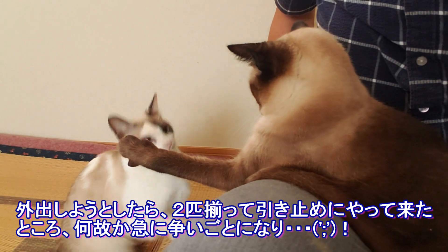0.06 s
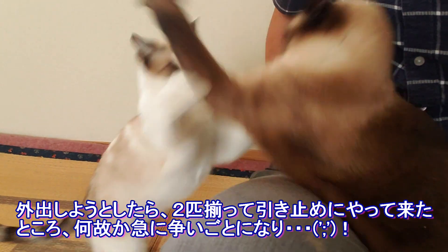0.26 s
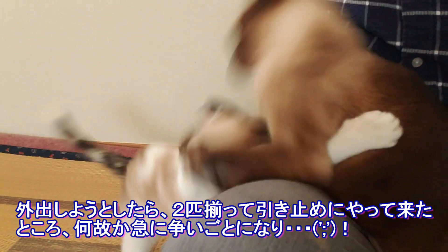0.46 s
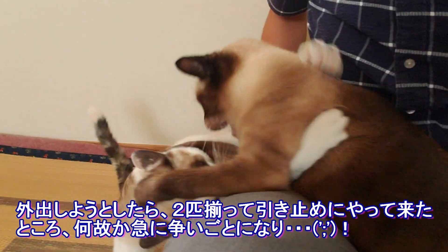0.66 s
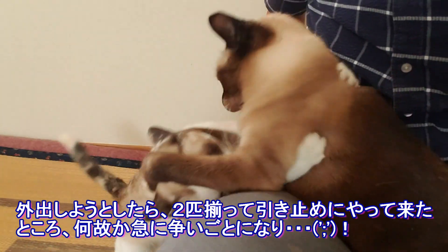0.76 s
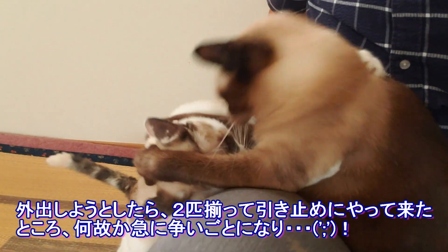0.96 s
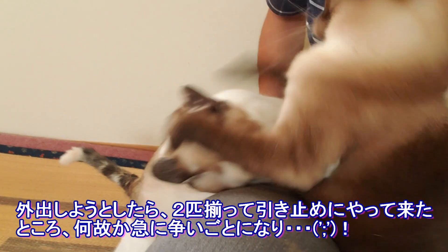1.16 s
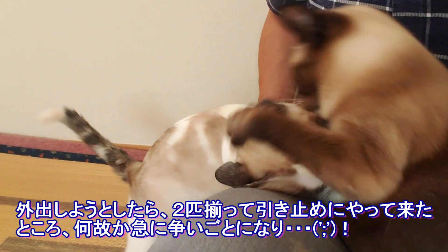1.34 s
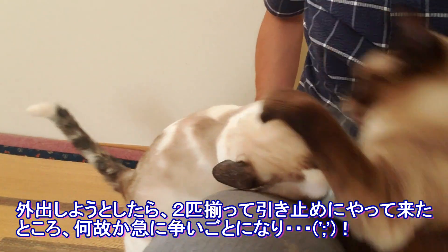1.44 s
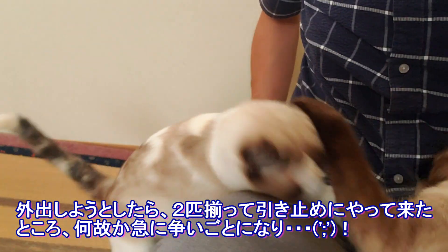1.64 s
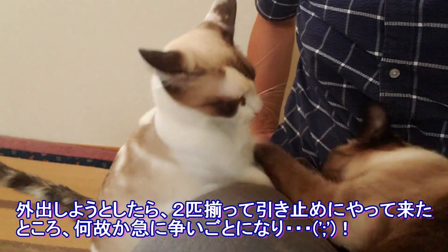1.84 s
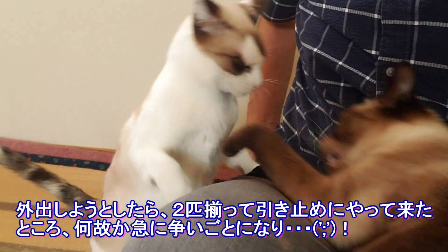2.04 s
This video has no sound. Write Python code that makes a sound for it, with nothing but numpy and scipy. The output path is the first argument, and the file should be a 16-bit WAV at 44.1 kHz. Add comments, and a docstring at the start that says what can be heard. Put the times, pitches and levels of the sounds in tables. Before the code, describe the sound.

Cats wrestle up close: cloth and fur rustle while paws scrabble and claws tick.

```python
"""Two cats wrestling on a lap

In a quiet room, close to a small camera, friction makes cloth rustle and fur hiss and swish over fur.
Bodies knock softly in low damped modes, paws scrabble in runs of tiny impacts, and claws tick and snag
with a brief ring. The two microphone ports drift from nearly in phase in the bass to opposite above it."""
import sys
import numpy as np
from scipy import signal
from scipy.fft import rfft, irfft, next_fast_len
from scipy.io import wavfile
from scipy.ndimage import uniform_filter1d

SR = 44100
rng = np.random.default_rng(int(sys.argv[2]) if len(sys.argv) > 2 else 0)


def put_to_file(sound):
    """Save the sound as 16-bit audio at rate SR, in the file named by the first command-line argument."""
    columns = np.atleast_2d(sound).T  # one column per channel
    safe = np.clip(columns, -1, 1)
    whole_steps = np.round(safe * 32767)
    wavfile.write(sys.argv[1], SR, whole_steps.astype(np.int16))


N = 92610

# Colour that the microphone gives to sharp edges: frequency_hz, gain_db
EDGE_TONE = [(300, -20), (1200, -8), (3000, 0), (4000, -5), (7000, -1), (8800, -14), (11500, -6),
             (16000, -12)]
# Course of the rubbing: time_s, cloth_db, fur_hiss_db, swish_db
RUBBING_LEVELS = [(0, -67, -73, -74.5), (.325, -58.5, -62, -69), (.356, -40.5, -43, -60),
                  (.44, -43.5, -46.5, -54), (.55, -37.5, -48, -49), (.66, -48, -45, -35.5),
                  (.74, -46, -54.5, -53.5), (.86, -63, -53.5, -48.5), (.93, -67.5, -63.5, -55.5),
                  (1.07, -57, -60.5, -64), (1.11, -51.5, -57.5, -64.5), (1.25, -45.5, -45.5, -46.5),
                  (1.33, -49.5, -54, -57.5), (1.435, -48, -56, -65), (1.46, -40.5, -42.5, -51),
                  (1.63, -43, -47.5, -52.5), (1.69, -43.5, -49, -51), (1.745, -55, -58, -55.5),
                  (1.78, -45.5, -45.5, -52.5), (1.92, -58.5, -51.5, -49), (2.03, -68, -65, -64),
                  (2.1, -58, -57, -59.5)]


def amp(db):
    """Amplitude ratio of a level in decibels."""
    return 10 ** (np.asarray(db) / 20)


def unit_rms(x):
    """Normalisation to a mean power of one."""
    return x / np.sqrt(np.mean(x ** 2) + 1e-20)


def at_frequency(table, hz, column=1):
    """Interpolation of a table on a logarithmic frequency axis."""
    columns = np.transpose(table)
    return np.interp(np.log(hz + 1), np.log(columns[0] + 1), columns[column])


def envelope(table, column=1):
    """Amplitude over time, moving linearly in decibels between points."""
    columns = np.transpose(table)
    return amp(np.interp(np.arange(N) / SR, columns[0], columns[column]))


def add(mix, start_s, sound):
    """Superposition of a sound on the mix."""
    part = mix[round(start_s * SR):][:len(sound)]
    part += sound[:len(part)]


def coloured(x, tone):
    """Minimum-phase filtering: the phase follows from the Hilbert transform of the log gain."""
    log_gain = np.log(amp(at_frequency(tone, abs(np.fft.fftfreq(4096, 1 / SR)))))
    taps = np.fft.ifft(np.exp(np.conj(signal.hilbert(log_gain)))).real[:2048]
    return signal.oaconvolve(x, taps)[:len(x)]


def noise_pair(tone, patchy_db, flicker_db, size=256):
    """Two incoherent noises, modulated by the same spectral patches and flicker; joint rms 1."""
    frames, hz = N * 4 // size + 5, np.fft.rfftfreq(size, 1 / SR)
    re0, im0, re1, im1, patches = rng.standard_normal((frames, len(hz), 5)).T
    patches = unit_rms(uniform_filter1d(uniform_filter1d(patches, size=9, axis=0), size=14, axis=1))
    flicker = unit_rms(uniform_filter1d(rng.standard_normal(frames), size=5))
    gain = amp(at_frequency(tone, hz)[:, None] + patchy_db * patches + flicker_db * flicker)
    spectra = np.array([re0 + 1j * im0, re1 + 1j * im1]) * gain
    return unit_rms(signal.istft(spectra, nperseg=size, noverlap=size * 3 // 4)[1][:, :N])


def grains(samples, per_s=800, spread_db=4.5):
    """Shot noise: sparse clicks of random sign and power-law size, a few of them large."""
    sign, size, chance = rng.random((samples, 3)).T
    return np.sign(sign - .5) * amp(-spread_db * np.log(size + 0.028)) * (chance < per_s / SR)


def background():
    """The noise floor: a low, lumpy rumble under room air and microphone hiss."""
    # Course of the rumble: time_s, level_db
    rumble_levels = [(0, -56), (.3, -53.5), (.4, -44), (1.15, -51), (2.1, -54)]
    # Spectra of the rumble and of the air with its hiss: frequency_hz, density_db
    rumble_tone = [(22, -18), (34, -20), (42, 6.5), (54, -8.5), (85, -6), (130, -14.5), (300, -50)]
    air_tone = [(220, -12), (400, -12), (1300, -14.5), (1800, -25), (3000, -48), (5500, -29.5),
                (7200, -22.5), (8800, -38), (16000, -30)]
    rumble = noise_pair(rumble_tone, patchy_db=-3, flicker_db=0.7, size=8192)
    air = noise_pair(air_tone, patchy_db=2.5, flicker_db=1.5, size=1024)
    return envelope(rumble_levels) * rumble + amp(-55.5) * air


def cloth_rustle():
    """Sliding friction on cloth gives broadband noise with a crackle in it."""
    # Spectrum of rubbed cloth: frequency_hz, density_db
    cloth_tone = [(100, -39), (220, 2), (1300, 1), (3500, -7.5), (9000, -29)]
    crackle = unit_rms(coloured(grains(N, per_s=700, spread_db=2.0), cloth_tone))
    rustle = noise_pair(cloth_tone, patchy_db=4.0, flicker_db=0.5)
    rustle[0] = unit_rms(rustle[0] + .6 * crackle)
    return envelope(RUBBING_LEVELS) * rustle


def fur_rubbing():
    """Friction of fur on fur gives a treble hiss with fine scratches, and a higher swish."""
    # Spectra of the hiss and the swish: frequency_hz, density_db
    hiss_tone = [(2500, -78), (4000, 1.5), (5300, 2.5), (7200, 6), (9000, -10.5), (12000, -14)]
    swish_tone = [(6000, -35), (8800, -0.5), (11000, 20), (11600, 16), (12700, 18.5), (13600, 6.5),
                  (16000, -13)]
    hiss = noise_pair(hiss_tone, patchy_db=2.2, flicker_db=1.8)
    scratches = unit_rms(coloured(grains(N), hiss_tone))
    hiss[0] = unit_rms(hiss[0] + .7 * scratches)
    swish = noise_pair(swish_tone, patchy_db=3.0, flicker_db=0.55)
    return envelope(RUBBING_LEVELS, column=2) * hiss + envelope(RUBBING_LEVELS, column=3) * swish


def body_knocks():
    """A soft impact excites two low, heavily damped modes; lower knocks ring longer."""
    # Knocks of bodies and paws: start_s, level_db, pitch_hz
    knocks = [(.379, -32, 212), (.484, -33, 93.5), (.5175, -16, 716), (.533, -32.5, 103),
              (.592, -31.5, 197), (1.446, -21, 597), (1.452, -16.5, 432), (1.471, -27, 500),
              (1.518, -21.5, 224), (1.562, -40.5, 74.5), (1.764, -28.5, 380)]
    rise_s, base_ring_s, ring_cycles = 0.00061, 0.0089, 8.7
    mix = np.zeros(N)
    for start_s, level_db, pitch_hz in knocks:
        t60 = base_ring_s + ring_cycles / pitch_hz
        t = np.arange(round(t60 * SR)) / SR
        phase = 2 * np.pi * pitch_hz * t
        modes = np.sin(phase) + amp(-10.5) * np.sin(1.3 * phase)
        add(mix, start_s, amp(level_db - 60 * t / t60) * (1 - np.exp(-t / rise_s)) * modes)
    return mix


def paw_scrabbles():
    """Dense tiny impacts drive a broad cloth resonance; their derivative adds a treble edge."""
    # Runs of paws over cloth: start_s, length_s, level_db, centre_hz, treble_db
    scrabbles = [(.357, 0.03, -42, 1100, -21), (.47, 0.042, -34, 2350, -23), (.516, 0.029, -28, 2100, -2),
                 (.64, 0.061, -41.5, 5540, -33), (.762, 0.067, -43, 2600, -24),
                 (1.452, 0.006, -31, 1930, -43), (1.456, 0.0044, -37, 5400, 2),
                 (1.675, 0.037, -46.5, 3733, 5), (1.763, 0.015, -38, 4760, 35)]
    swell_s, fade_db = .15, -12  # a run of length swell_s would take all of it to set in
    mix = np.zeros(N)
    for start_s, length_s, level_db, hz, treble_db in scrabbles:
        progress = np.arange(round(length_s * SR)) / (length_s * SR)
        contour = np.minimum(progress * swell_s / length_s, 1) * amp(fade_db * progress ** 2)
        friction = unit_rms(grains(len(progress))) + 0.3 * rng.standard_normal(len(progress))
        drive = np.append(contour * friction, np.zeros(600))
        resonance = [(hz / 5, -18), (hz * 0.68, -3), (hz * 0.84, -1), (hz * 2.4, -16), (SR / 2, -50)]
        body = unit_rms(coloured(drive, resonance))
        edge = unit_rms(coloured(np.diff(drive, prepend=0), EDGE_TONE))
        add(mix, start_s, amp(level_db) * unit_rms(body + amp(treble_db) * edge))
    return mix


def claw_ticks():
    """A sharp impact gives a damped ring, a bright edge and a puff of cloth noise."""
    # Ticks and snags of claws: start_s, level_db, pitch_hz, edge_db
    ticks = [(.1185, -35, 7000, 6.5), (.3352, -12.5, 6800, -23), (.3602, -16.5, 6900, 3),
             (.5095, -18, 1510, -17), (.5205, -14.5, 2240, -13), (.5245, -19, 1790, -18),
             (.4856, -33, 1680, -24), (.4904, -16, 2220, -6), (.5171, -18.5, 1720, 14.5),
             (.5352, -15, 2710, -2), (.5929, -21.5, 2440, 1), (.8395, -29.5, 1660, -17),
             (.9927, -32, 1650, -21), (.3807, -23, 790, -26.5), (1.0872, -30, 5500, -5),
             (1.1013, -20, 2940, -24), (1.104, -35, 2460, -22), (1.1109, -8, 2770, -10),
             (1.1333, -20, 3200, -4), (1.1651, -3, 2960, -6.5), (1.2403, -23.5, 1120, -1),
             (1.2559, -15.5, 3050, -4), (1.3669, -23.5, 1400, -0.5), (1.4469, -12.5, 2820, 1),
             (1.4532, -4.5, 2930, -4), (1.5179, -15, 1200, 0.5), (1.639, -11.5, 1505, -10),
             (1.7798, -32, 6400, -15), (1.8322, -14.5, 7600, -22)]
    rise_cycles, ring_cycles = .25, 5  # the ring falls 60 dB in ring_cycles
    edge_t60_s, puff_t60_s = 0.0018, 0.0031
    t = np.arange(1500) / SR
    burst = amp(-60 * t / edge_t60_s) + amp(-22.5 - 60 * t / puff_t60_s)
    mix = np.zeros(N)
    for start_s, level_db, pitch_hz, edge_db in ticks:
        cycles = pitch_hz * t
        # Only the lower ticks have an overtone, and it dies faster than the fundamental.
        overtone_ratio = 1.85 * rng.uniform(0.86, 1.125)
        overtone_gain = amp(3 - 30 * cycles / ring_cycles) * (pitch_hz < SR / 10)
        modes = np.sin(2 * np.pi * cycles) + overtone_gain * np.sin(2 * np.pi * overtone_ratio * cycles)
        ring = (1 - np.exp(-cycles / rise_cycles)) ** 2 * amp(-60 * cycles / ring_cycles) * modes
        edge = amp(edge_db) * coloured(burst * rng.standard_normal(len(t)), EDGE_TONE)
        bass_cut = signal.butter(2, pitch_hz / 2, "high", fs=SR)  # a small source radiates little bass
        add(mix, start_s, amp(level_db) * signal.lfilter(*bass_cut, edge - 2 * ring))
    return mix


def reflections(x, t60_s):
    """Convolution with sparse, exponentially dying echoes of random sign and total energy 1."""
    delays = np.arange(60, 9000, 20)
    signs = rng.choice([-1., 1.], len(delays))
    taps = np.zeros(9100)
    taps[delays + rng.integers(0, 20, len(delays))] = signs * amp(-60 * delays / SR / t60_s)
    return signal.fftconvolve(x, taps / np.linalg.norm(taps))[:N]


def scene():
    """The sources superposed: row 0 is the left port, row 1 the part only the right port hears."""
    impacts = claw_ticks() + paw_scrabbles() + body_knocks()
    left = impacts + amp(-18) * reflections(impacts, t60_s=.18)
    right_only = amp(-2) * reflections(impacts, t60_s=.02)
    return np.array([left, right_only]) + cloth_rustle() + fur_rubbing() + background()


def record(dry):
    """Partial coherence: the right port mixes the phase-shifted left with its own; both are low-passed."""
    # Right port against left: frequency_hz, coherence, lag_rad, gain_db
    ports = [(40, .75, .3, -7), (130, .55, 1.2, -5.5), (260, .8, 2.0, -4), (700, .9, 2.95, -3),
             (6000, .93, 3.14, -3)]
    size = next_fast_len(N + 8192)
    hz = np.fft.rfftfreq(size, 1 / SR)
    shared, own = rfft(dry, size)
    coherence, lag_rad, gain_db = (at_frequency(ports, hz, column) for column in (1, 2, 3))
    blend = coherence * np.exp(-1j * lag_rad) * shared + np.sqrt(1 - coherence ** 2) * own
    right = irfft(amp(gain_db) * blend, size)[:N]
    band_limit = signal.firwin(511, cutoff=16200, window=("kaiser", 9), fs=SR)
    return signal.oaconvolve(np.array([dry[0], right]), band_limit[None], "same")


dry = scene()
out = record(dry)
put_to_file(out)
```